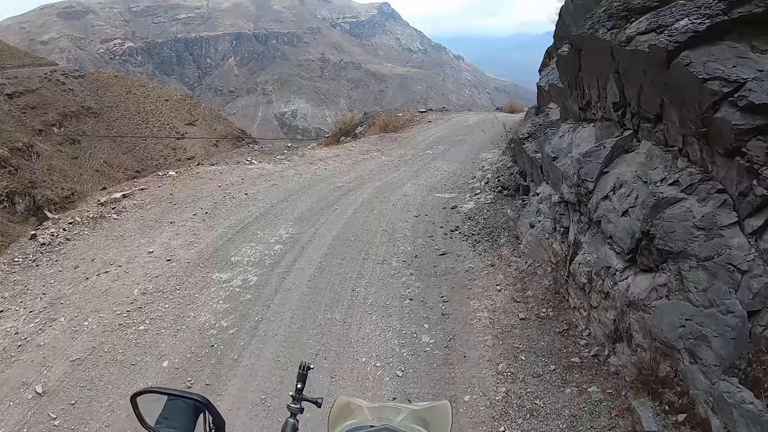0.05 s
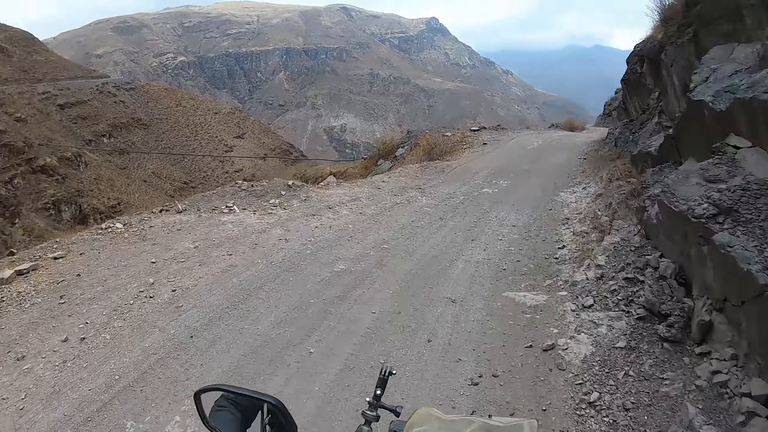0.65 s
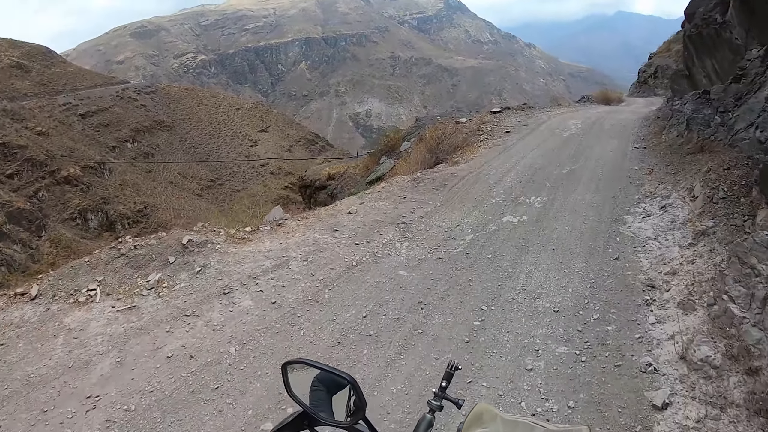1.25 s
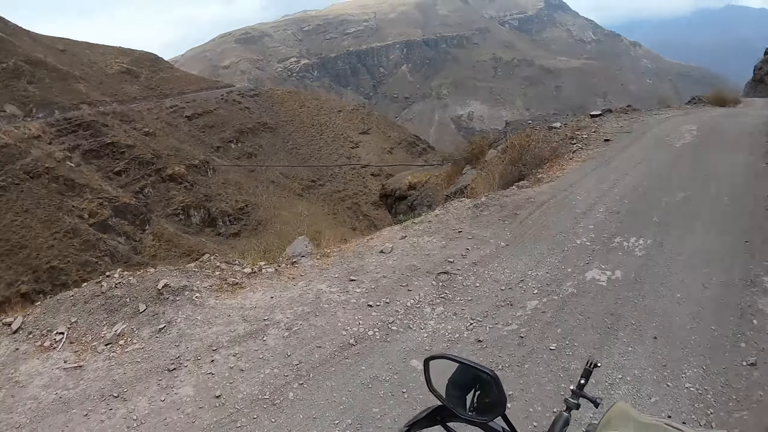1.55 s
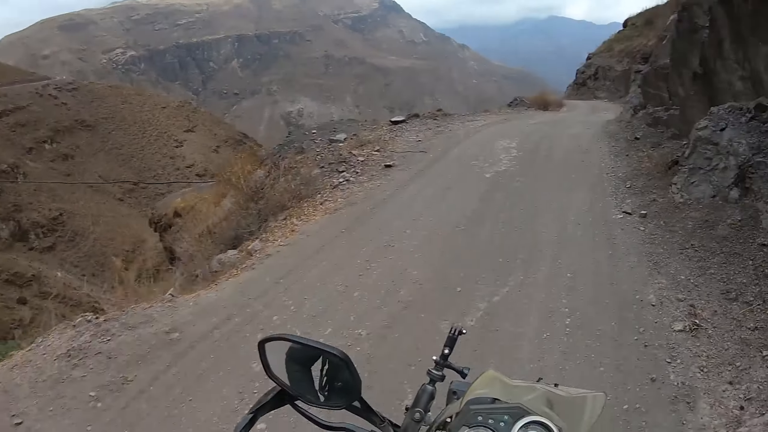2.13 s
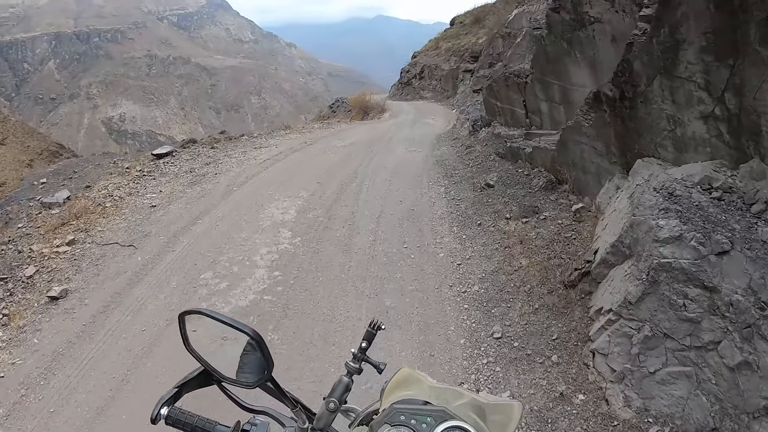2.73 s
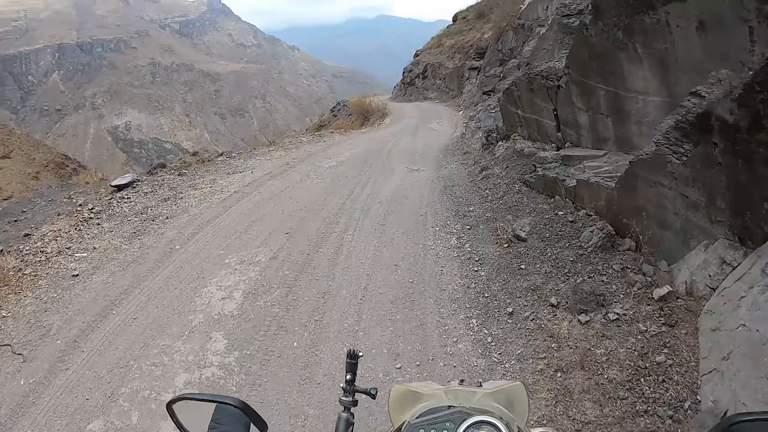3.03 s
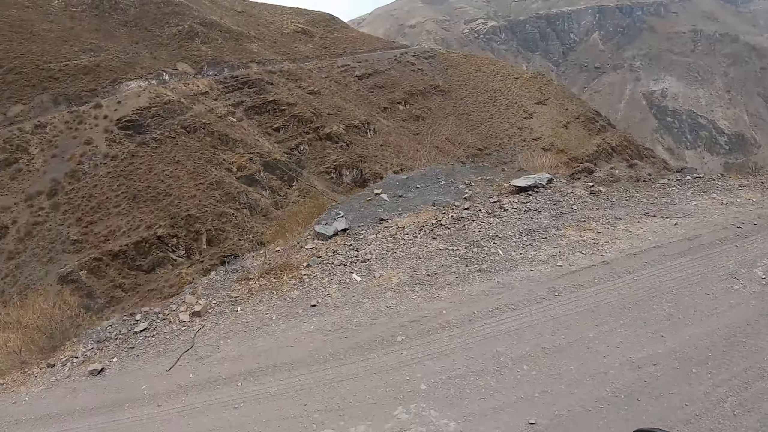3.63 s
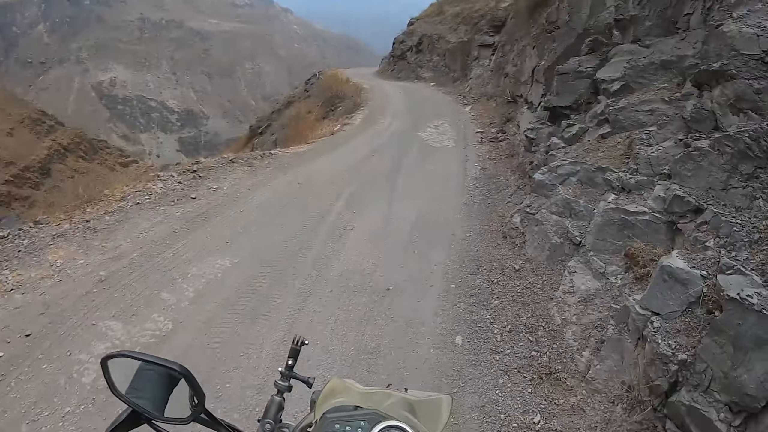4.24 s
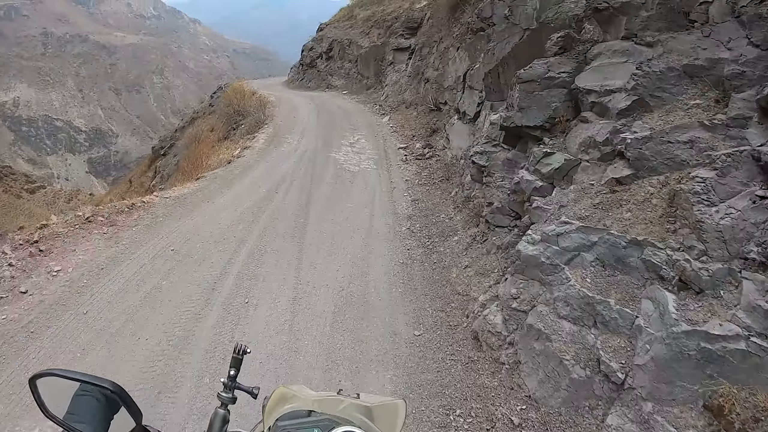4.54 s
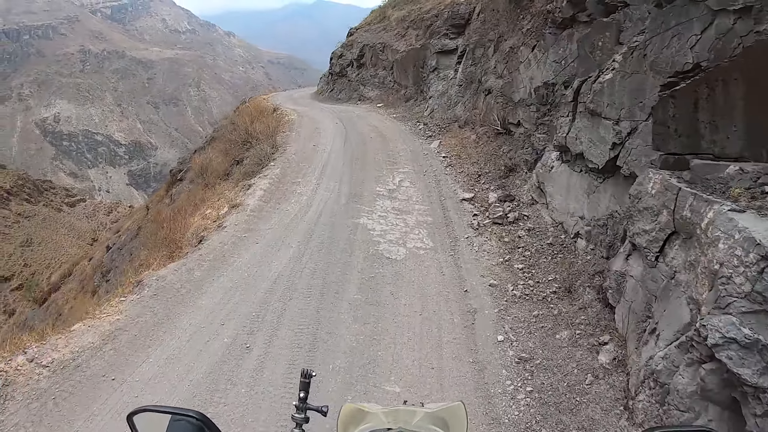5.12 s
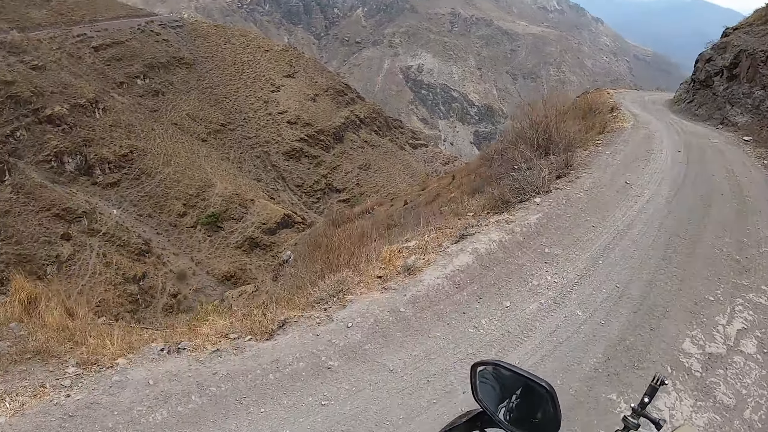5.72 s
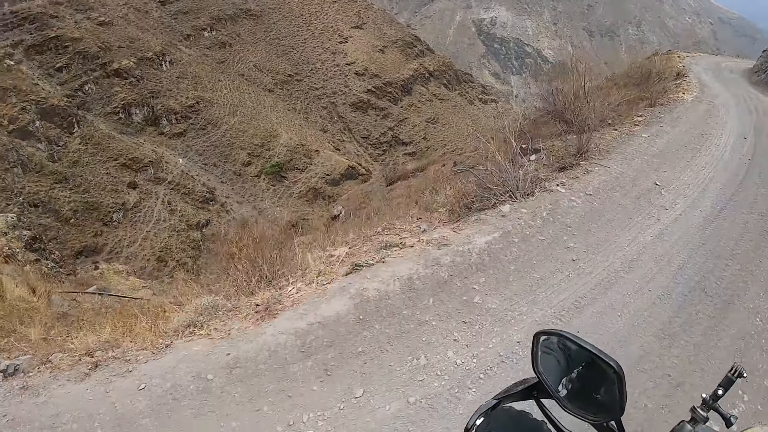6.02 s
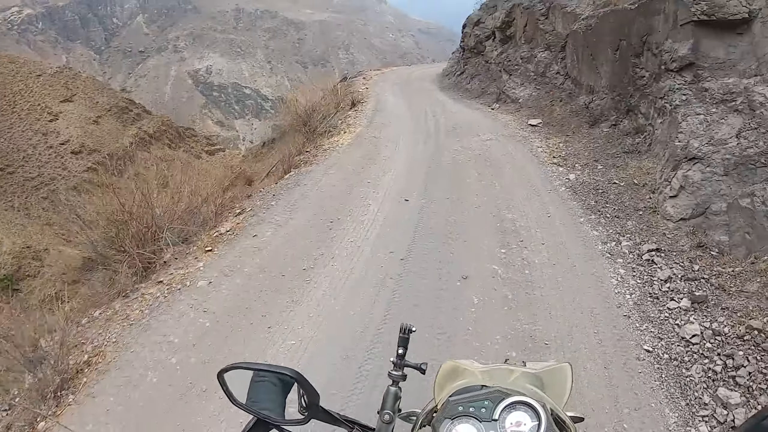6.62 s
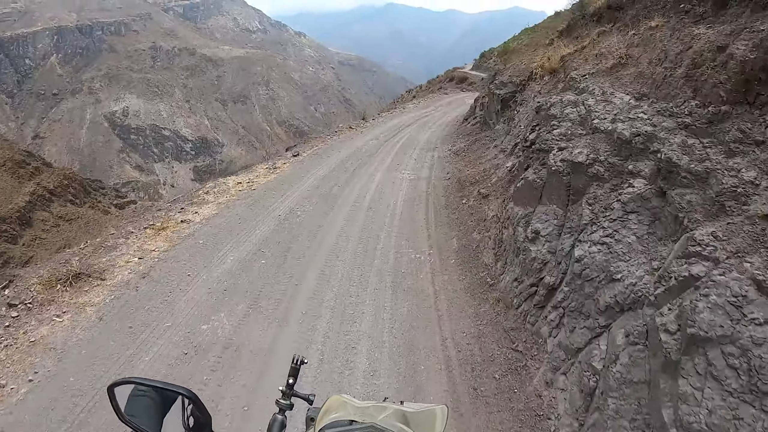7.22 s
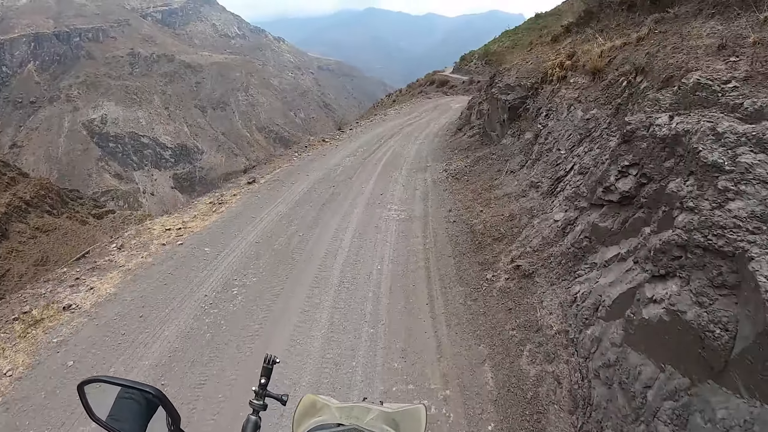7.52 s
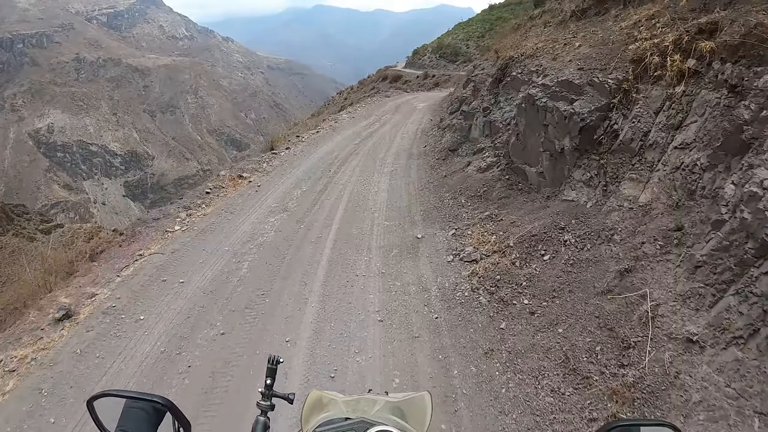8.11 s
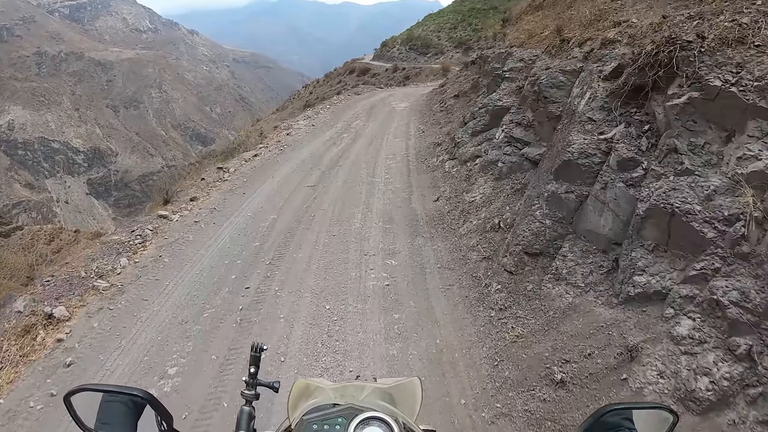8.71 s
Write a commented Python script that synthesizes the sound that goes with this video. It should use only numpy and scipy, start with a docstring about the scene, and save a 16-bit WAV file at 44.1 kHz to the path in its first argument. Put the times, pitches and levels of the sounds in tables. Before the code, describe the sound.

A single-cylinder motorcycle cruises along a gravel road and speeds up late on, with wind buffeting the microphone and loose parts rattling.

```python
"""A single-cylinder motorcycle cruises along a gravel road, heard from the rider's helmet.
From the start the exhaust throbs, the intake rasps, the crankcase whines and the valve gear clatters,
while tyres rush over gravel and wind buffets the microphone. Gusts thud, and bumps shake loose parts.
Past four seconds the engine sags, then picks up. Near seven comes one short dry click, and the bike
speeds up into harder, brighter gusts, easing off in the last second."""
import sys
import numpy as np
from scipy import signal
from scipy.fft import rfft, irfft
from scipy.io import wavfile

SR = 44100
rng = np.random.default_rng(int(sys.argv[2]) if len(sys.argv) > 2 else 0)


def dump_mix(stems):
    """Bounce the given channels to the path in sys.argv[1] as a 16-bit WAV at rate SR."""
    frames = np.atleast_2d(stems).T  # one column per channel
    limited = np.clip(frames, -1, 1)  # hard clip at full scale
    pcm = np.round(limited * 32767).astype(np.int16)
    wavfile.write(sys.argv[1], SR, pcm)


N = 395136
TIME = np.arange(N) / SR

# Engine speed and the exhaust's swell: time_s, firing_hz, exhaust_db
ENGINE = [(0, 26.3, -41), (.7, 27.7, -34.5), (1.1, 27.3, -31), (1.45, 29.6, -27), (1.95, 30.8, -31.5),
          (2.45, 29, -33.5), (2.9, 26.8, -36.5), (3.4, 26, -29), (4.3, 22.5, -43.5), (5.2, 28.8, -35),
          (5.55, 30.6, -26), (6.25, 28.7, -37), (6.95, 28.2, -36), (7.14, 32.3, -28.5), (7.3, 34.2, -27),
          (7.55, 36, -32), (7.96, 38, -30), (8.25, 33, -34.5), (8.96, 29, -36)]
# Mechanical noise under load: time_s, intake_db, valve_gear_db
ENGINE_LOAD = [(0.0, -55, -60), (0.78, -52, -54), (.95, -56, -55.5), (1.15, -59.5, -57.5), (2.02, -60, -57),
               (2.72, -59.5, -58), (3.07, -54, -57.5), (3.77, -60.5, -61.5), (4.4, -57.5, -57),
               (4.77, -51, -53.5), (5.14, -56, -58), (5.56, -60.5, -59.5), (5.99, -70, -57),
               (6.24, -60.5, -58), (6.94, -53.5, -57), (6.98, -49, -53), (7.25, -54, -55.5),
               (7.99, -53.5, -53.5), (8.38, -54.5, -57), (8.96, -60.5, -59.5)]
# Rush of tyres and air: time_s, level_db
RUSH = [(0.0, -50), (1.32, -53.5), (2.24, -48), (2.82, -54.5), (3.54, -45), (3.89, -46), (4.32, -54.5),
        (4.67, -51), (4.91, -45.5), (5.59, -52), (5.99, -46.5), (6.79, -51), (7.04, -49.5), (7.14, -47),
        (7.81, -42.5), (8.06, -45), (8.66, -51.5), (8.96, -47.5)]
# Tone of air hitting the microphone port: frequency_hz, level_db
GUST_TONE = [(60, -28), (150, 10.5), (300, 4.5), (600, -3), (1200, -6.5), (2000, -12), (12000, -40)]


def amp(db):
    """Decibels to gain."""
    return 10 ** (np.asarray(db) / 20)


def unit(x):
    """Scales to an rms of 1."""
    return x / np.sqrt(np.mean(x ** 2) + 1e-20)


def curve(rows, column=1):
    """One column of a timed table, drawn as a line through every sample."""
    rows = np.array(rows)
    return np.interp(TIME, rows[:, 0], rows[:, column])


def rise(rows):
    """How far a curve stands above its own mean."""
    return curve(rows) - curve(rows).mean()


def wander(rate_hz):
    """Smooth random drift of rms 1, rolling off around rate_hz."""
    hz = np.fft.rfftfreq(N, 1 / SR)
    return unit(irfft(rfft(rng.standard_normal(N)) * np.exp(-(hz / rate_hz) ** 2), N))


def colour(x, tone, edge_hz=np.inf):
    """Equalises x to a tone curve, falling steeply above the edge, at rms 1."""
    f = np.fft.rfftfreq(len(x), 1 / SR) + 1
    hz, db = np.transpose(tone)
    gain = amp(np.interp(np.log(f), np.log(hz), db)) / np.hypot(1, (f / edge_hz) ** 4)
    return unit(irfft(rfft(x) * gain, len(x)))


def resonate(x, hz, width_hz):
    """A resonance with steep skirts, at rms 1."""
    f = np.fft.rfftfreq(len(x), 1 / SR)
    return unit(irfft(rfft(x) / (1 + 1j * (f - hz) / width_hz) ** 2, len(x)))


def steady(x, samples):
    """Irons out swells slower than the given span, leaving rms 1."""
    return unit(x / np.sqrt(signal.oaconvolve(x ** 2, np.hanning(samples), "same") + 1e-9))


def add_swell(mix, middle_s, sound, half_length_s):
    """Mixes in a sound under a bell-shaped fade around middle_s."""
    t = (np.arange(len(sound)) - len(sound) // 2) / SR
    start = max(round((middle_s + t[0]) * SR), 0)
    part = mix[start:start + len(sound)]
    part += (sound * np.exp(-2 * (t / half_length_s) ** 2))[:len(part)]


def exhaust(cycle, trim_db=-1, breathe_db=2.4, uneven=0.36):
    """One puff per firing, uneven in strength and spacing; the pipe favours the fourth harmonic."""
    # The pipe's note: firing_harmonic, level_db
    pipe = [(1, -6.5), (2, -11), (3, -8.5), (4, -1.5), (5, -16), (6, -19), (7, -23), (9, -22)]
    strength = unit(1 + uneven * wander(30))
    timing = cycle + 0.016 * wander(14)
    note = sum(amp(db + breathe_db * wander(13)) * np.sin(2 * np.pi * k * timing) for k, db in pipe)
    return np.sqrt(2) * note * strength * amp(curve(ENGINE, column=2) + trim_db)


def intake(cycle, trim_db=2, throb=0.18):
    """Drawn-in air rasps, throbbing with each turn of the crank, twice a cycle."""
    # Tone of the rasp: frequency_hz, level_db
    rasp_tone = [(200, -11.5), (600, -1), (1200, -2.5), (1950, 4.5), (2600, -4.5), (3400, -10), (3900, -17),
                 (5500, -18), (7000, -47), (14000, -69)]
    airflow = rng.standard_normal(N) * (1 + throb * np.cos(2 * np.pi * 2 * cycle))
    return amp(curve(ENGINE_LOAD) + trim_db) * colour(airflow, rasp_tone)


def crankcase(cycle, throb=0.4):
    """The gears shake the case into a fuzzy whine that drifts in pitch and throbs with the crank."""
    # Course of the whine: time_s, level_db, pitch_hz
    singing = [(0, -50, 975), (.2, -53, 970), (.35, -61, 975), (1.3, -58.5, 985), (1.6, -66.5, 980),
               (2.8, -56, 965), (3.3, -61, 950), (4.7, -56, 980), (5.6, -62, 960), (7.2, -61.5, 965),
               (7.8, -47, 1000), (8.05, -51, 965), (8.3, -60, 965)]
    # Its partials, each a narrow band of noise: pitch_ratio, width_hz, level_db
    partials = [(1, 30, 6), (1.055, 28.5, 4), (2, 45.1, -7)]
    phase = 2 * np.pi * np.cumsum(curve(singing, column=2)) / SR
    whine = sum(amp(db) * (wander(width_hz) * np.cos(k * phase) + wander(width_hz) * np.sin(k * phase))
                for k, width_hz, db in partials)
    return amp(curve(singing)) * unit(whine * (1 + throb * np.cos(2 * np.pi * 2 * cycle)))


def valve_gear(cycle, trim_db=0.3, fins_db=-6, accent=0.89, fade_cycles=0.3, uneven=0.31, flicker_db=1.1):
    """The valves clatter once a cycle over the hiss of the chain, and ring the cooling fins."""
    # Tone of valves and chain: frequency_hz, level_db
    valve_tone = [(1500, -15.5), (3300, -6.5), (3900, -0.5), (4700, -0.5), (5900, -12), (7000, -28.5),
                  (8000, -26.5), (9500, -41), (15000, -70)]
    # Resonances of the fins: pitch_hz, width_hz, level_db
    fin_modes = [(3504, 25, -6), (3862, 54, 4.5), (4060, 26, 3.5), (4265, 20, 2), (4640, 37, -0.5)]
    clatter = np.exp(-(cycle % 1) / fade_cycles) * (1 + uneven * wander(25))
    hiss, taps = rng.standard_normal((2, N)) * (1 + accent * clatter) * amp(flicker_db * wander(25))
    fins = unit(sum(amp(db) * resonate(taps, hz, width_hz) for hz, width_hz, db in fin_modes))
    return amp(curve(ENGINE_LOAD, column=2) + trim_db) * (colour(hiss, valve_tone) + amp(fins_db) * fins)


def tyres(trim_db=0.7, clump_db=1, grit_db=2):
    """Gravel and air rush by in clumps; loose patches swish under the tyres."""
    # Tone of tyres on gravel: frequency_hz, level_db
    gravel_tone = [(200, -1.5), (450, 4), (750, 1.5), (1050, -3), (1500, -9), (1900, -11.5), (2600, -23.5),
                   (5000, -31), (9000, -64.5)]
    # Loose patches: middle_s, level_db, half_length_s
    patches = [(.3, -52, 0.048), (0.424, -54, 0.037), (1.85, -49, 0.081), (3.346, -40.5, 0.058),
               (3.532, -44, .04), (4.324, -48, .025), (5.974, -46.5, 0.29), (6.394, -50, .06)]
    gravel = rng.standard_normal(N) * amp(clump_db * wander(8) + grit_db * wander(190))
    swishes = sum(amp(db) * np.exp(-2 * ((TIME - middle_s) / half_length_s) ** 2)
                  for middle_s, db, half_length_s in patches)
    return (amp(curve(RUSH) + trim_db) + swishes) * colour(gravel, gravel_tone)


def surges(half_length_s=0.027, gusty_db=2.5):
    """The wind's quick swings in dB: large eddies thump, lulls drop out, small swings come by chance."""
    # Large eddies and, below zero, lulls: middle_s, rise_db
    eddies = [(.26, 9), (1.22, 5), (1.43, 7.5), (1.59, 8.5), (1.73, 7), (1.86, 6.5), (2.561, 5), (3.52, 9),
              (3.98, 7.5), (4.25, 5.5), (4.86, 5), (4.971, 7), (5.07, 7), (5.47, 3), (5.66, 7.5),
              (6.04, 10), (7.031, 10), (7.95, 5.5), (8.31, 5.5), (8.439, 4.5), (8.64, 9.5), (1.08, -8),
              (4.1, -0.5), (4.38, -7), (5.16, -6), (5.89, -11), (6.82, -14), (7.8, -6.5), (8.57, -4.5)]
    swings_db = sum(db * np.exp(-((TIME - middle_s) / half_length_s) ** 2) for middle_s, db in eddies)
    return swings_db + gusty_db * wander(16)


def wind(trim_db=1, flutter_db=-36, tear_power=0.29, lumpy_db=2):
    """Eddies rumble on the microphone; the strongest pressure swings tear into a brighter flutter."""
    # Strength of the wind at the helmet: time_s, level_db
    strength = [(0.0, -30), (0.29, -30), (0.75, -28), (1.67, -27.5), (2.31, -31), (3.53, -26),
                (4.61, -29.5), (4.91, -27), (5.13, -26.5), (5.59, -24.5), (5.76, -28.5), (6.63, -33.5),
                (6.92, -34), (7.0, -27), (7.19, -25), (8.228, -28), (8.494, -22.5), (8.96, -30)]
    # Tone of the rumble: frequency_hz, level_db
    rumble_tone = [(10, -10.5), (25, 0), (55, 5.5), (95, 2), (125, -1.5), (160, -10), (300, -35.5),
                   (1000, -96.5)]
    # Tone of the flutter: frequency_hz, level_db
    flutter_tone = [(80, -8), (150, 1), (205, -1), (300, -6), (420, -13.5), (600, -25.5), (1200, -33),
                    (3000, -82.5)]
    surge_db = surges()
    buffet = colour(rng.standard_normal(N), rumble_tone) * amp(lumpy_db * wander(25))
    rumble = steady(buffet, samples=4500)
    tearing = rng.standard_normal(N) * (abs(rumble) + 1e-6) ** tear_power
    flutter = steady(colour(tearing, flutter_tone), samples=16000)
    # The flutter partly follows the wind, its surges and the rush of the air.
    stir_db = 0.54 * rise(strength) + 0.36 * surge_db + 0.33 * rise(RUSH)
    return amp(curve(strength) + surge_db + trim_db) * rumble + amp(stir_db + flutter_db) * flutter


def spatter(trim_db=1, spread_db=6, pops_per_s=60, fade_s=0.0076, edge_hz=950):
    """The smallest eddies pop on the microphone port at random: dull lumps that start sharply and fade."""
    hits = rng.random(N) < pops_per_s / SR
    weights = amp(spread_db * np.minimum(rng.standard_normal(N), 1))
    lumps = signal.lfilter([1], [1, -np.exp(-1 / (fade_s * SR))], hits * weights)
    return amp(curve(RUSH) + trim_db) * colour(lumps * rng.standard_normal(N), GUST_TONE, edge_hz)


def gusts(crackle_db=3):
    """A gust breaks up on the microphone port: a soft one in a dull thud, a hard one in a ragged knock."""
    # Gusts that hit: middle_s, level_db, half_length_s, treble_edge_hz
    knocks = [(.256, -33.5, .0066, 900), (0.844, -26.5, 0.046, 300), (2.121, -35.5, 0.027, 453),
              (2.322, -31, .014, 290), (2.554, -31.5, 0.0083, 710), (3.11, -28, 0.049, 278),
              (3.277, -24.5, 0.0091, 280), (3.367, -23.5, 0.048, 171), (4.049, -34, 0.042, 910),
              (4.158, -28, 0.0083, 500), (4.748, -28.5, 0.012, 650), (4.879, -32, .04, 796),
              (4.988, -26, 0.015, 850), (5.043, -28.5, 0.0071, 850), (5.114, -29.5, 0.014, 550),
              (5.192, -32.5, 0.022, 1500), (5.215, -25.5, 0.019, 230), (5.294, -25, 0.026, 250),
              (5.419, -27, 0.027, 560), (6.42, -37, .09, 424), (6.978, -33, 0.0089, 2300),
              (7.032, -33, 0.053, 900), (7.545, -26.5, 0.022, 2030), (7.635, -26, 0.019, 2200),
              (7.658, -24.5, 0.017, 2370), (7.745, -26.5, 0.023, 1500), (7.899, -27.5, 0.021, 1700),
              (8.464, -31.5, .1, 700), (8.636, -28, 0.049, 2200), (8.735, -29, 0.021, 1890)]
    thuds = np.zeros(N)
    ragged = steady(amp(crackle_db * wander(220)), samples=1500)
    for middle_s, db, half_length_s, edge_hz in knocks:
        blast = steady(colour(rng.standard_normal(SR), GUST_TONE, edge_hz), samples=1500)
        add_swell(thuds, middle_s, amp(db) * blast, half_length_s)
    return thuds * ragged


def rattles(chatter_db=3):
    """Bumps shake loose parts into short, bright chatters."""
    # Bumps: middle_s, level_db, half_length_s
    bumps = [(0.565, -51, 0.0059), (.681, -48, 0.0046), (1.886, -54.5, 0.11), (3.644, -52, 0.013),
             (4.74, -48, 0.0055), (6.056, -49, 0.02), (6.348, -48, 0.021), (8.153, -49, .003)]
    # Tone of the loose parts: frequency_hz, level_db
    rattle_tone = [(600, -11), (1800, 0.5), (3800, 5), (5500, -0.5), (6800, -29.5), (8800, -22.5),
                   (13000, -68)]
    shaken = np.zeros(N)
    for middle_s, db, half_length_s in bumps:
        jangle = colour(rng.standard_normal(SR // 2), rattle_tone)
        add_swell(shaken, middle_s, amp(db) * jangle, half_length_s)
    return shaken * unit(amp(chatter_db * wander(400)))


def squeaks(width_hz=150):
    """Now and then metal rubs with a thin squeak."""
    # Rubs and chinks: middle_s, level_db, half_length_s, pitch_hz
    rubs = [(0.871, -50, 0.01, 5640), (1.149, -58, 0.018, 5770), (3.473, -58, 0.015, 5650),
            (4.154, -53, 0.0073, 4860)]
    rubbed = np.zeros(N)
    for middle_s, db, half_length_s, pitch_hz in rubs:
        squeal = steady(resonate(rng.standard_normal(SR // 2), pitch_hz, width_hz), samples=1000)
        add_swell(rubbed, middle_s, amp(db) * squeal, half_length_s)
    return rubbed


def click(start_s=6.973, level_db=-20.5, fade_s=0.000028):
    """One short dry click."""
    since_s = TIME - start_s
    return amp(level_db) * (since_s >= 0) * np.exp(-abs(since_s) / fade_s)


def scene():
    """Engine, road and wind at one microphone, and one short dry click."""
    cycle = np.cumsum(curve(ENGINE)) / SR  # four-stroke cycles gone by
    engine = exhaust(cycle) + intake(cycle) + crankcase(cycle) + valve_gear(cycle)
    road = tyres() + rattles() + squeaks()
    air = wind() + spatter() + gusts()
    return (engine + road + air + click())[None]


def record(dry, ceiling_db=-5, edge_hz=16300):
    """The microphone rounds off the hardest pressure swings; then the very top of the treble is cut."""
    rounded = amp(ceiling_db) * np.tanh(dry / amp(ceiling_db))
    lowpass = signal.firwin(511, edge_hz, window=("kaiser", 9), fs=SR)
    return signal.oaconvolve(rounded, lowpass[None], "same")


dry = scene()
out = record(dry)
dump_mix(out)
```